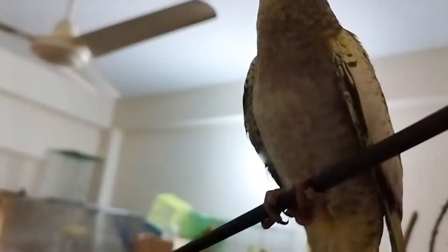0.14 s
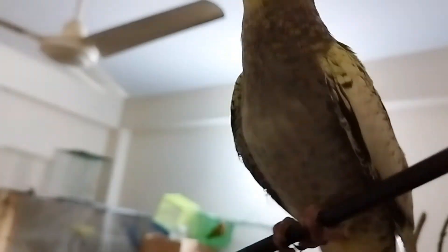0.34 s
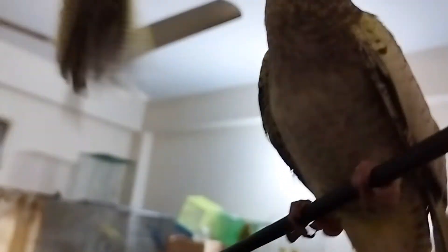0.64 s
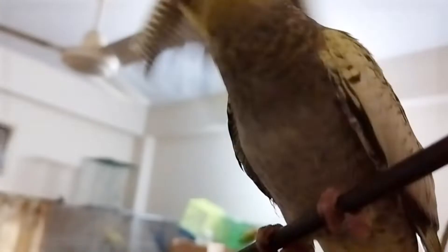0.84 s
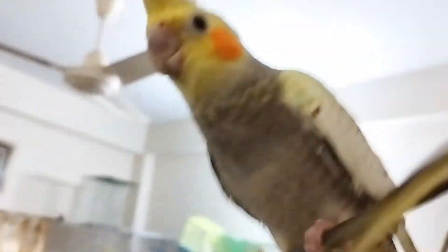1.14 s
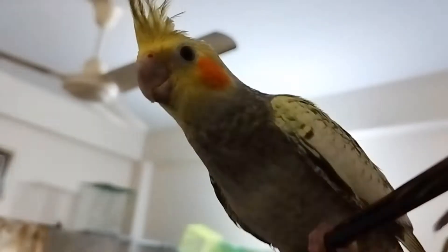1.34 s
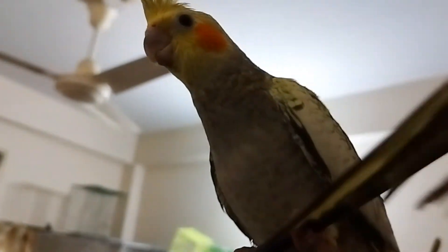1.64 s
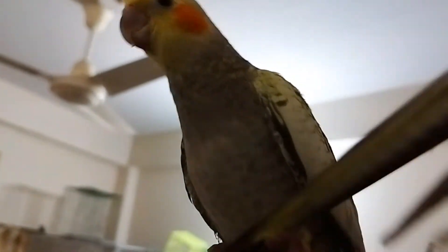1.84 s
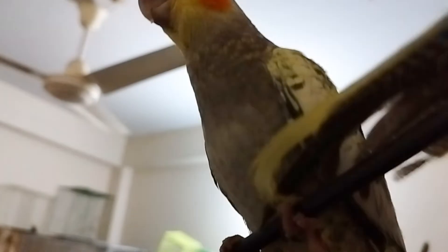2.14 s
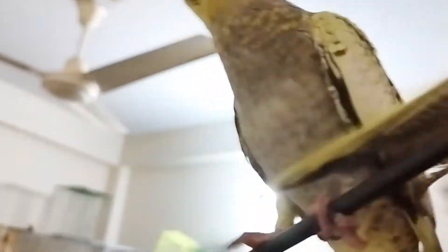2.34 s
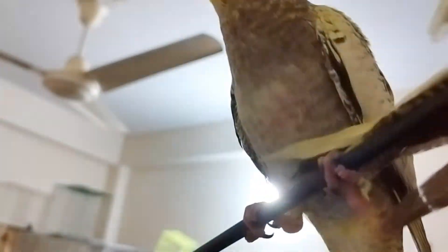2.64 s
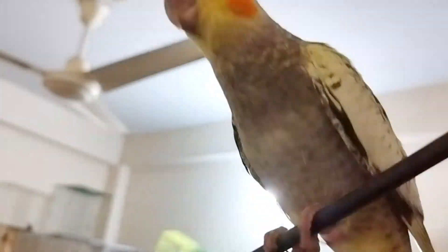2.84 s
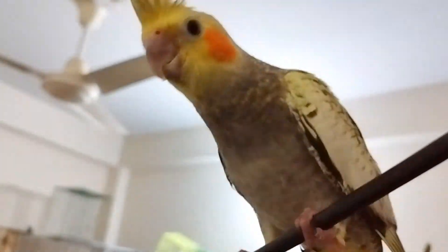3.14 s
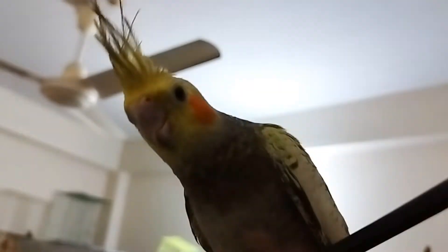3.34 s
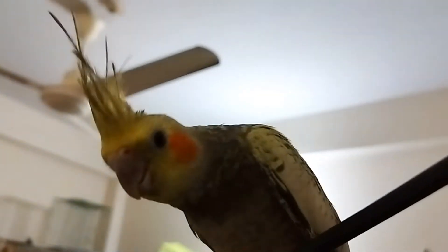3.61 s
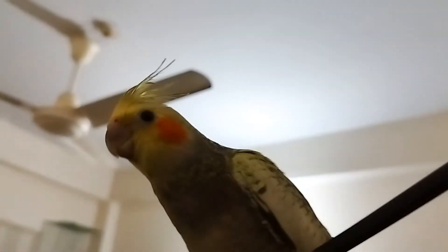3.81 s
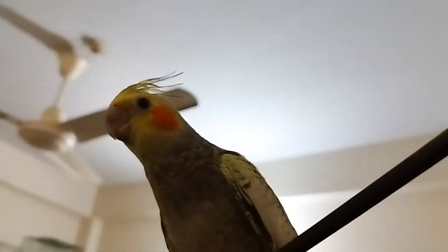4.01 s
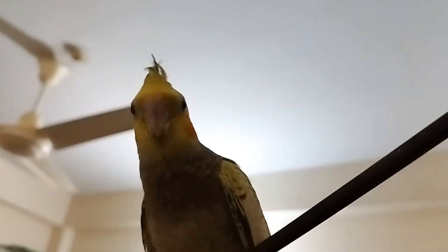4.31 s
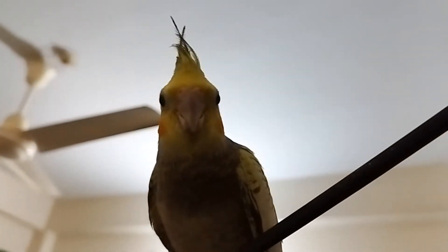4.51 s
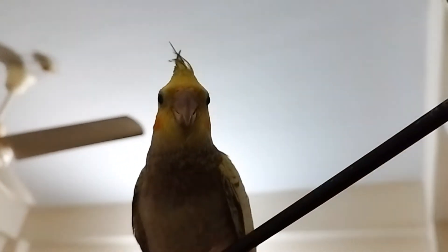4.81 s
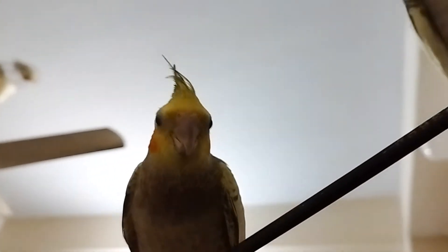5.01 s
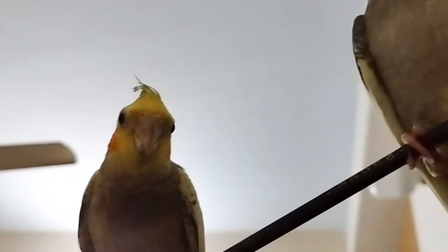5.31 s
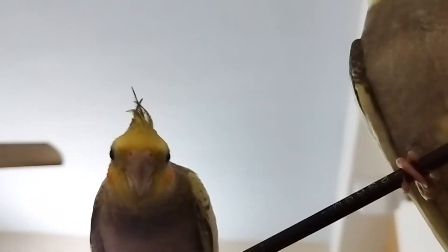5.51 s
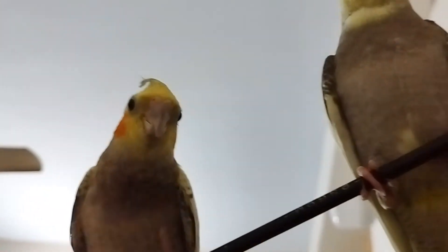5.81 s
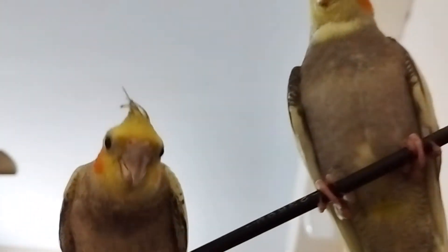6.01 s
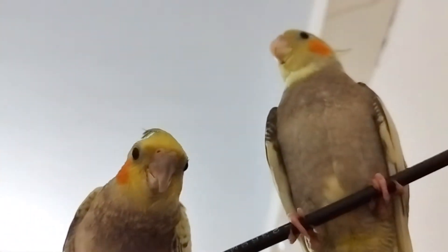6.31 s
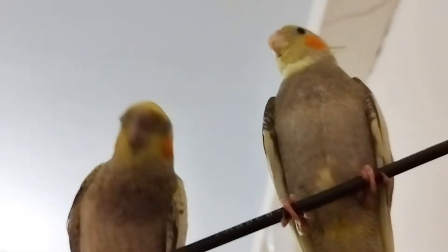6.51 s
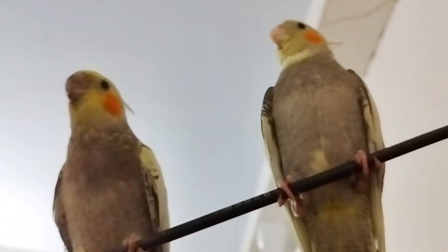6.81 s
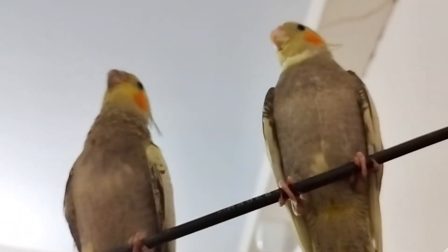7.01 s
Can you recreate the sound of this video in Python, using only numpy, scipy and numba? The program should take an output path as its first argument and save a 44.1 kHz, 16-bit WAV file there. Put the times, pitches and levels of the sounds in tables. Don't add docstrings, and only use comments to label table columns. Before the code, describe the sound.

Close to a perch of cockatiels in a bare, reverberant room. Short harsh rasps open, then about six low wingbeat thuds flutter past and their air buffets the microphone. Whistles climb behind. From the middle, shrill screeches burst out, the loudest overloading and squashing the phone's sound, with one quick arched whistle. Afterwards only more distant chatter and thin whistles remain.

```python
import sys
import numpy as np
from scipy import signal
from scipy.fft import rfft, irfft, next_fast_len
from scipy.io import wavfile
from scipy.ndimage import uniform_filter1d
from numba import njit

SR = 44100
rng = np.random.default_rng(int(sys.argv[2]) if len(sys.argv) > 2 else 0)


def to_wav(s):
    ch = np.atleast_2d(s).T
    pcm = np.round(np.clip(ch, -1, 1) * 32767)
    wavfile.write(sys.argv[1], SR, pcm.astype(np.int16))


def volts(x):
    e = np.asarray(x, float) / 20
    return 10 ** e


N = 315315
LONGEST = 16000


def unit(x):
    return x / np.sqrt(np.mean(x ** 2, axis=-1, keepdims=True))


def colour(x, spectrum, tilt_db=0.):
    size = next_fast_len(x.shape[-1])
    octave = np.log2(np.maximum(np.arange(size // 2 + 1) * SR / size, 1.))
    hz, db = np.transpose(spectrum)
    gain_db = np.interp(octave, np.log2(hz), db) + tilt_db * np.clip(octave - np.log2(3000), -2, 2)
    return irfft(rfft(x, size) * volts(gain_db), size)[..., :x.shape[-1]]


def wander(noise, hz):
    return unit(signal.lfilter(*signal.butter(2, hz, fs=SR), noise))


def add(track, s, sound):
    i = int(s * SR)
    sound = sound[max(-i, 0):max(N - i, 0)]
    track[max(i, 0):max(i, 0) + len(sound)] += sound


def swell(t, length, rise, fall):
    return np.clip(t / rise, 0, 1) * np.clip((length - t) / fall, 0, 1)


def syrinx(hz, rough, odd_db, chance, wobble, breath_db):
    shake, size, air = chance[:, :len(hz)]
    drift = .05 * rough * wander(size[::-1], 25)
    shaken_hz = hz * (1 + drift + wobble * rough * wander(shake, 473))
    phase = 2 * np.pi * np.cumsum(shaken_hz) / SR
    k = np.arange(1, int(15000 / hz.max()) + 1)[:, None]
    weight = np.where(k % 2, volts(odd_db), 1)
    partials = unit((weight * np.sin(k * phase)).sum(axis=0))
    smear = volts(9 * rough * wander(size, 200)) + 1.3 * rough * wander(air, 300)
    return partials * smear + volts(breath_db) * rough * air


def screeches():
    # start_s, length_s, pitch_hz, level_db, odd_partials_db
    calls = [
        (2.792, 0.14, 1048, 10, -9),
        (3.569, .16, 1043, 12.5, -9.5),
        (4.162, 0.14, 1088, -7, -1),
        (4.324, 0.19, 1035, 14.5, -9),
        (4.611, .18, 1036, 13, -10.5),
        (4.925, .15, 1045, 12.5, -17),
    ]
    # frequency_hz, gain_db
    throat = [(600, -11.5), (1050, -1), (2100, -5.5), (3000, 7.5), (4250, 5), (5250, 3), (6300, -5),
              (7200, 4), (7800, 10), (8600, 6.5), (9400, 2.5), (10300, -4.5), (11200, -18.5), (14200, -38)]
    track = np.zeros(N)
    for (s, length, hz, db, odd_db), chance in zip(calls, rng.standard_normal((len(calls), 3, LONGEST))):
        t = np.arange(int(length * SR)) / SR
        pitch = hz * (1.015 - .03 * t / length)
        voice = syrinx(pitch, .45, odd_db, chance, wobble=.085, breath_db=-4)
        add(track, s, volts(db) * unit(colour(voice, throat)) * swell(t, length, .045, .07))
    return track


def rasps(calls, throat, rough, rise, slide):
    track = np.zeros(N)
    for (s, length, hz, db, tilt_db), chance in zip(calls, rng.standard_normal((len(calls), 3, LONGEST))):
        t = np.arange(int(length * SR)) / SR
        pitch = hz * (1 + .4 * (t - length / 2) - slide * np.exp(-t / .025))
        voice = syrinx(pitch, rough, -1.5, chance, wobble=.1, breath_db=-5)
        add(track, s, volts(db) * unit(colour(voice, throat, tilt_db)) * swell(t, length, rise, .5 * length))
    return track


def near_rasps():
    # start_s, length_s, pitch_hz, level_db, brightness_db_per_octave
    calls = [(-.14, 0.21, 1379, -15, 6.5), (.384, 0.2, 1407, -5.5, 10.5), (.903, 0.18, 1419, -6, 10.5),
             (1.601, .11, 1565, -11, 15.5), (2.185, .087, 1495, -27, 11.5), (2.629, .14, 2160, -14.5, 11.5),
             (2.705, 0.16, 1328, -5, 9), (2.98, .17, 1357, -1, 11.5), (3.495, .13, 1667, -6.5, 11.5),
             (3.749, .14, 1239, 4.5, 12.5), (4.15, 0.055, 1462, -7.5, 13), (4.291, 0.044, 1475, -6.5, 10.5),
             (4.903, 0.062, 1515, 2.5, 10.5), (5.627, 0.043, 1215, -28.5, 12.5),
             (6.523, 0.044, 1430, -24.5, 18)]
    # frequency_hz, gain_db
    throat = [(500, -24), (800, 9), (1200, 5), (1600, 6), (2200, -6), (2850, -1.5), (3300, 8), (3900, 3),
              (4600, -6.5), (6000, -21.5), (7200, -16), (8400, -20.5), (9500, -22), (12000, -56),
              (14200, -56)]
    return rasps(calls, throat, rough=.62, rise=.018, slide=.45)


def whistles(notes, wobble, second_db, third_db):
    track = np.zeros(N)
    for note, (shake, size) in zip(notes, rng.standard_normal((len(notes), 2, LONGEST))):
        s, hz, db = np.transpose(note)
        t = np.arange(min(int((s[-1] - s[0]) * SR), LONGEST)) / SR
        pitch = np.interp(t + s[0], s, hz) * (1 + wobble * wander(shake, 310)[:len(t)])
        phase = 2 * np.pi * np.cumsum(pitch) / SR
        tone = np.sin(phase) + volts(second_db) * np.sin(2 * phase) + volts(third_db) * np.sin(3 * phase)
        level_db = np.interp(t + s[0], s, db) + 3 * wander(size, 80)[:len(t)]
        add(track, s[0], tone * volts(level_db) * swell(t, t[-1], .008, .015))
    return track


def arched_whistle():
    start_s, top_s, end_s = 4.57, 4.675, 4.785
    t = np.linspace(start_s, end_s, num=24)
    away = np.abs(t - top_s) / (top_s - start_s)
    drop = np.where(t < top_s, away ** 1.7, 0.49 * away ** 2.6)
    note = np.transpose([t, 2926 - 1056 * drop, -4.5 - 6 * away ** 2])
    return whistles([note], 0.012, -26, -40) * volts([[1.5], [-9]])


def glide(calls, ease, start_db, end_db):
    u = np.linspace(0, 1, num=24)
    shape_db = np.interp(u, [0, .5, 1], [start_db, 0, end_db])
    notes = []
    for s, length, from_hz, to_hz, db in calls:
        moving_s = min(length, .092)
        left = np.maximum(1 - u * length / moving_s, 0) ** ease
        notes.append(np.transpose([s + length * u, to_hz + (from_hz - to_hz) * left, db + shape_db]))
    return notes


def far_whistles():
    # start_s, length_s, first_pitch_hz, last_pitch_hz, level_db
    rising = [(1.25, 0.083, 2225, 2590, -30.5), (1.24, 0.11, 3450, 3640, -23.5),
              (1.325, 0.23, 1848, 3052, -10.5), (1.32, 0.054, 3380, 5780, -31),
              (2.245, 0.1, 1970, 2361, -11), (2.295, .13, 2532, 3372, -4), (2.24, 0.14, 3776, 4793, -17.5),
              (2.4, .08, 3500, 4010, -22), (2.52, 0.079, 3350, 3490, -12.5),
              (3.465, 0.067, 1337, 1757, -21.5), (4.08, 0.067, 1957, 2260, -56.5),
              (4.148, 0.016, 3100, 3160, -14), (4.59, 0.039, 2118, 2434, -3),
              (5.755, 0.078, 4400, 4670, -21), (5.755, 0.079, 2060, 2310, -20),
              (5.86, 0.11, 2690, 2856, -24.5), (6.02, 0.0526, 2860, 3196, -14),
              (6.11, .05, 3500, 3900, -28), (6.1, .06, 5220, 5540, -33), (6.15, .11, 3960, 5300, -26),
              (6.14, .11, 2085, 2220, -23), (6.32, 0.15, 3176, 3390, -7), (6.803, 0.045, 3050, 3613, -16),
              (6.82, .1, 3796, 3960, -20.5)]
    # start_s, length_s, first_pitch_hz, last_pitch_hz, level_db
    falling = [(1.812, 0.028, 4980, 4650, -14.5), (1.82, 0.042, 3860, 1733, -29),
               (1.89, 0.22, 3240, 2340, -42.5), (5.35, 0.079, 3100, 2158, -35.5),
               (5.71, 0.073, 3900, 2200, -31), (5.83, 0.076, 3980, 3780, -28),
               (5.8, 0.053, 1276, 1280, -31), (6.24, .05, 3790, 3255, -17),
               (6.41, 0.053, 6500, 2500, -27.5), (6.99, 0.079, 3150, 2330, -35.5),
               (7.125, .04, 3780, 3380, -19)]
    # start_s, length_s, first_pitch_hz, last_pitch_hz, level_db
    coo = [
        (1.79, .33, 305, 309, -45),
    ]
    notes = glide(rising, 1.3, -5, 1) + glide(falling, 2.2, 3, 2)
    return whistles(notes, .02, -31, -42) + whistles(glide(coo, 1, 0, -4), .004, -27, -44)


def chatter():
    # start_s, length_s, pitch_hz, level_db, brightness_db_per_octave
    calls = [(1.1, 0.28, 1407, -30, 11), (1.365, 0.22, 1433, -18, 13), (1.82, .06, 1587, -26, 16),
             (1.9, 0.079, 1330, -23.5, 14.5), (2.24, 0.13, 1987, -23, 17), (2.4, 0.22, 1700, -15, 9),
             (2.5, 0.2, 1625, -17.5, 11), (3.15, 0.33, 1126, -28.5, 10), (3.385, 0.23, 1246, -23, 17),
             (3.95, 0.26, 1224, -31.5, 2), (5.17, 0.13, 1128, -20.5, 5), (5.42, 0.075, 1255, -33, 11.5),
             (5.75, .25, 1317, -24, 16.5), (5.85, .086, 1928, -22, 8), (5.95, 0.16, 1427, -27, 10),
             (6.08, 0.13, 1857, -22, 9.5), (5.92, 0.17, 1173, -19.5, 9.5), (6.16, 0.17, 1144, -20, 12.5),
             (6.26, 0.16, 1705, -19, 9.5), (6.43, .11, 1258, -26.5, 9.5), (6.58, 0.15, 1288, -29.5, 14.5),
             (6.83, 0.16, 1406, -35, 18), (6.9, 0.2, 1460, -34.5, 10.5), (7.09, .11, 1240, -28, 11.5)]
    # frequency_hz, gain_db
    throat = [(700, -2), (1200, 3), (1600, 6.5), (2300, 3), (3100, 4.5), (4000, -0.5), (5200, -21),
              (7000, -27), (9000, -25), (14200, -80.5)]
    return rasps(calls, throat, rough=.5, rise=.016, slide=.2)


def wings():
    # middle_s, left_db, right_db, width_s
    beats = [
        (.563, -24, -36, 0.0046),
        (0.685, -24, -27, 0.0046),
        (0.802, -25, -12.5, 0.0037),
        (.921, -13, -24, 0.0043),
        (1.027, -18, -21, 0.0051),
        (1.14, -12, -22, 0.0044),
    ]
    t = np.arange(N) / SR
    pressure = np.zeros((2, N))
    for s, left_db, right_db, width in beats:
        pressure -= volts([[left_db], [right_db]]) * np.exp(-.5 * ((t - s) / width) ** 2)
    return pressure


def gust_rumble(gusts):
    track = np.zeros(N)
    for (s, length, db, top_hz), noise in zip(gusts, rng.standard_normal((len(gusts), LONGEST))):
        eddies = unit(colour(noise, [(8, -12), (25, 0), (top_hz, -6), (4 * top_hz, -34), (15000, -90)]))
        n = int(length * SR)
        add(track, s - length / 2, volts(db) * eddies[:n] * np.hanning(n))
    return track


def draught():
    # middle_s, length_s, level_db, top_hz
    left_gusts = [
        (1.16, 0.056, -12, 92.5),
        (1.205, 0.12, -15, 195),
        (1.28, 0.075, -11.5, 315),
        (1.315, 0.035, -7.5, 112),
        (1.4, 0.077, -20.5, 280),
        (1.52, 0.082, -19.5, 60),
        (1.59, 0.13, -23, 49.6),
        (1.68, 0.043, -17.5, 165),
        (1.73, 0.094, -22, 111),
    ]
    # middle_s, length_s, level_db, top_hz
    right_gusts = [
        (1.2, 0.1, -23, 98),
        (1.27, .08, -25, 120),
        (1.34, 0.11, -15, 59.5),
        (1.47, 0.16, -27, 60.7),
        (1.62, 0.16, -26, 79.4),
        (2.3, .32, -35, 110),
        (5.3, 0.27, -33.5, 200),
        (6.7, .33, -36.5, 202),
    ]
    return np.array([gust_rumble(left_gusts), gust_rumble(right_gusts)])


def room(x, direct_db, early_db, lag):
    # frequency_hz, t60_s
    decay = [(300, .55), (2500, .5), (6000, .55), (12000, .52)]
    t = np.arange(SR) / SR
    noise = rng.standard_normal((2, SR))
    tail = 0
    for k, (_, t60) in enumerate(decay):
        band = [(hz, 0 if j == k else -40) for j, (hz, _) in enumerate(decay)]
        tail = tail + colour(noise, band) * 1000 ** (-t / t60)
    tail = tail * (1 + volts(early_db) * np.exp(-t / 0.032))
    tail = tail / np.sqrt((tail ** 2).sum(axis=1, keepdims=True))
    tail[0, max(lag, 0)] += volts(direct_db)
    tail[1, max(-lag, 0)] += volts(direct_db)
    return signal.fftconvolve(x[None], tail, axes=1)[:, :N]


def house():
    # frequency_hz, density_db_per_hz
    spectrum = [(12, -42.5), (20, 6.5), (71, 0), (527, -13.5), (817, -19), (964, -21), (1420, -19),
                (1810, -15.5), (1970, -8.5), (3710, -23.5), (14200, -34.5)]
    shared, left, right, drift = rng.standard_normal((4, N))
    floor = volts(-44) * unit(colour(np.array([left, right]) + 1.16 * shared, spectrum))
    bass = signal.lfilter(*signal.butter(2, 250, fs=SR), floor)
    return floor + bass * (volts(1.07 * wander(drift, 5.0)) - 1)


def scene():
    # time_s, left_minus_right_db
    flock_pan = [(0, -.5), (.7, .5), (1.5, 0), (3.2, -.5), (5, 0), (6.2, 1.5), (7.15, 1.5)]
    birds = room(screeches(), -10, 9, -30) + room(near_rasps(), -10, 5, 18)
    birds = birds + room(far_whistles() + chatter(), -10, 4, -22)
    pan_db = np.interp(np.arange(N) / SR, *np.transpose(flock_pan))
    birds = birds * volts(np.array([pan_db, -pan_db]) / 2)
    return birds + arched_whistle() + wings() + draught() + house()


@njit
def follow(x, attack, release):
    out, e = np.empty(len(x)), 0.
    for i in range(len(x)):
        e += (x[i] - e) * (attack if x[i] > e else release)
        out[i] = e
    return out


def squelch(x):
    masked_db, chance_db, from_hz = -3.5, 1.6, 3000
    hz, _, z = signal.stft(x, SR, nperseg=1024)
    power = uniform_filter1d((np.abs(z) ** 2).sum(axis=0), size=3, axis=1) + 1e-18
    band_db = 10 * np.log10(uniform_filter1d(power, size=4, axis=0))
    luck = np.kron(rng.standard_normal((129, power.shape[1] // 6 + 1)), np.ones((4, 6)))
    luck = luck[:len(hz), :power.shape[1]]
    under_db = np.maximum(band_db - uniform_filter1d(band_db, size=41, axis=0), masked_db + .5)
    keep = np.clip(under_db - masked_db + chance_db * luck, 0, 1) + (hz < from_hz)[:, None]
    return signal.istft(z * np.clip(keep, .03, 1), SR, nperseg=1024)[1][:, :N]


def low_pass(x):
    return signal.sosfilt(signal.butter(12, 14400, fs=SR, output="sos"), x)


def record(dry):
    excess = np.maximum(dry - np.array([[1.5], [1.3]]), 0)
    sag = volts(4.0) * signal.lfilter(*signal.butter(1, 6, fs=SR), excess)
    sensed = signal.lfilter(*signal.butter(2, 2.2, "high", fs=SR), dry - excess - sag)
    loudness = follow(np.abs(sensed).max(axis=0), 1 / (0.00015 * SR), 1 / (.12 * SR))
    gain = np.minimum(volts(-4.5) / (loudness + 1e-9), 1) ** 0.83
    rounded = .62 * np.tanh(sensed * gain / .62)
    top = signal.ellip(8, .3, 60, 14050, fs=SR, output="sos")
    mix = signal.sosfilt(top, squelch(rounded))
    return low_pass(mix)


dry = scene()
out = record(dry)
to_wav(out)
```